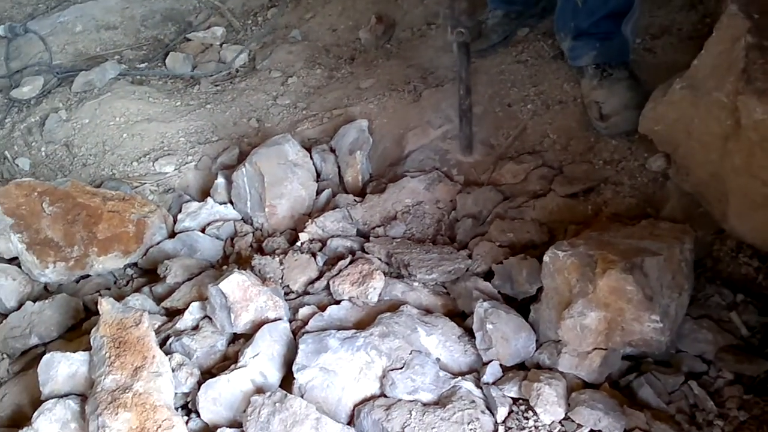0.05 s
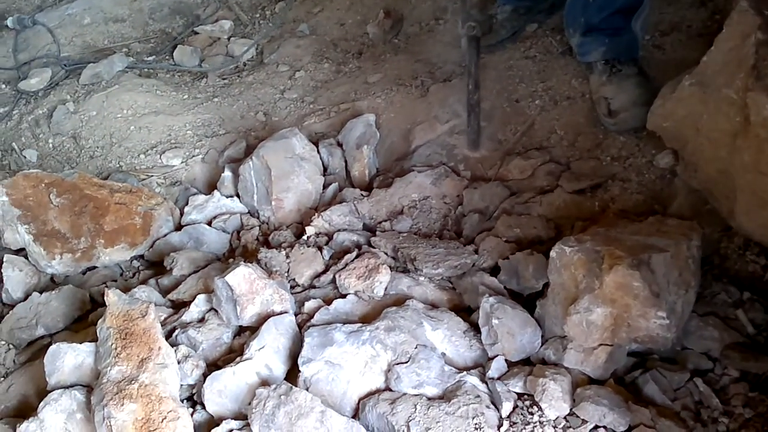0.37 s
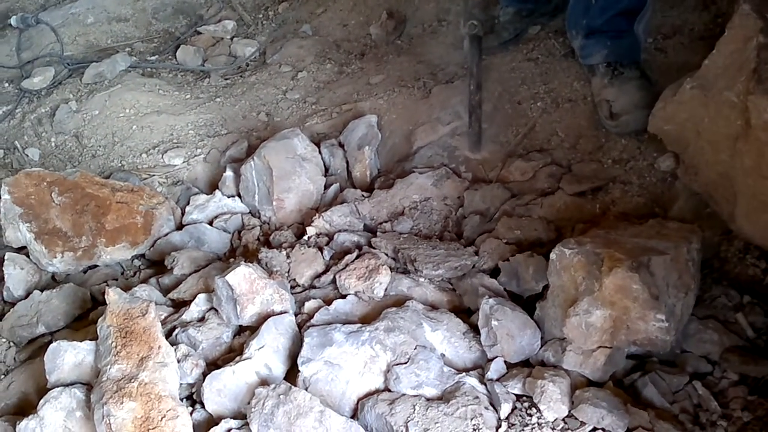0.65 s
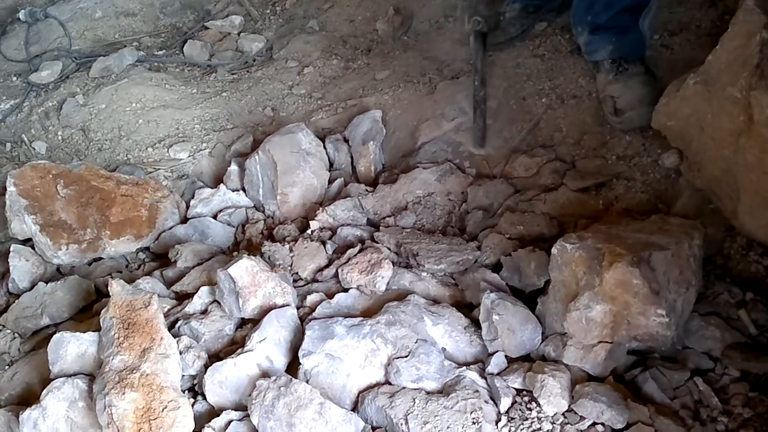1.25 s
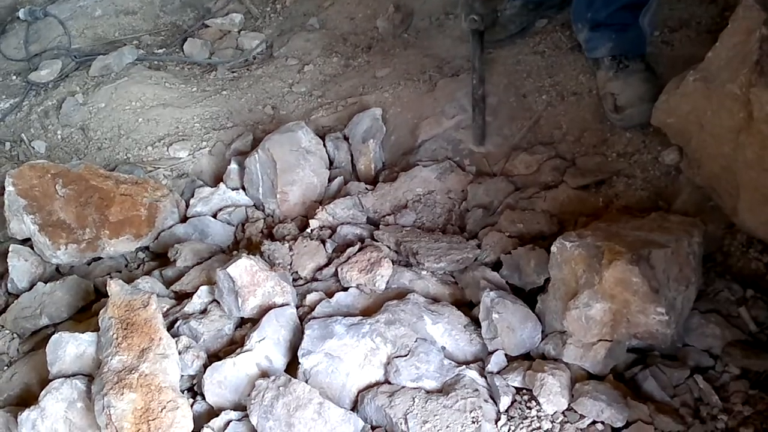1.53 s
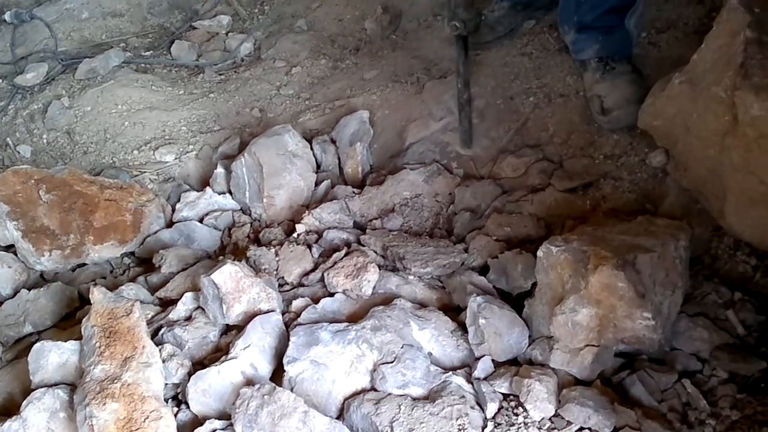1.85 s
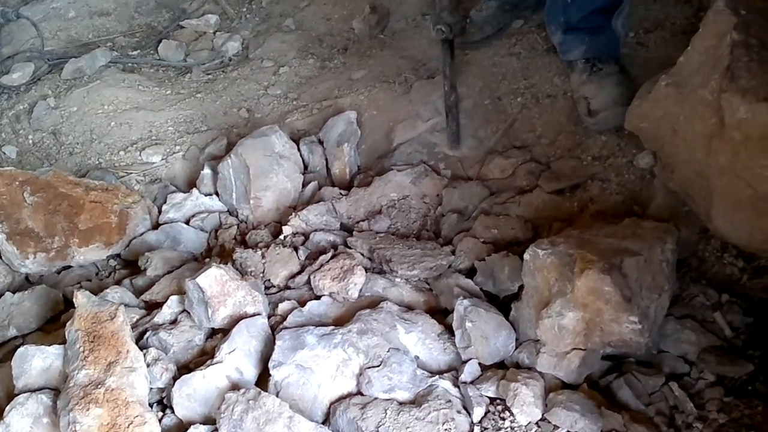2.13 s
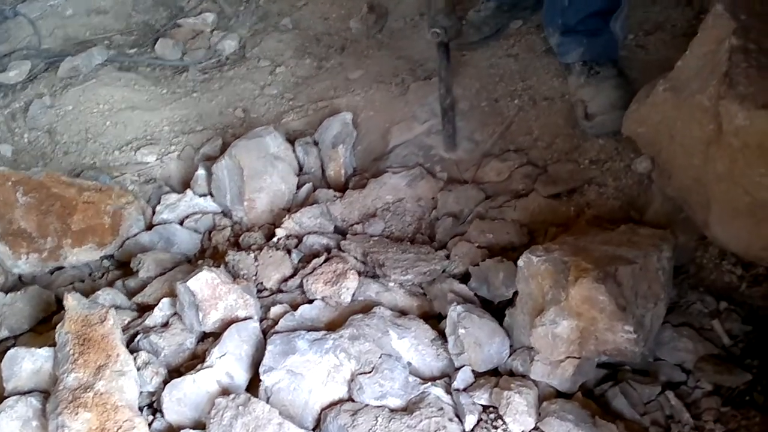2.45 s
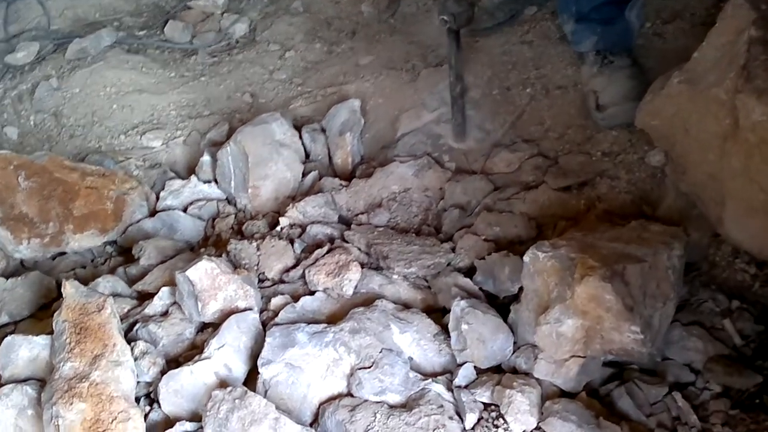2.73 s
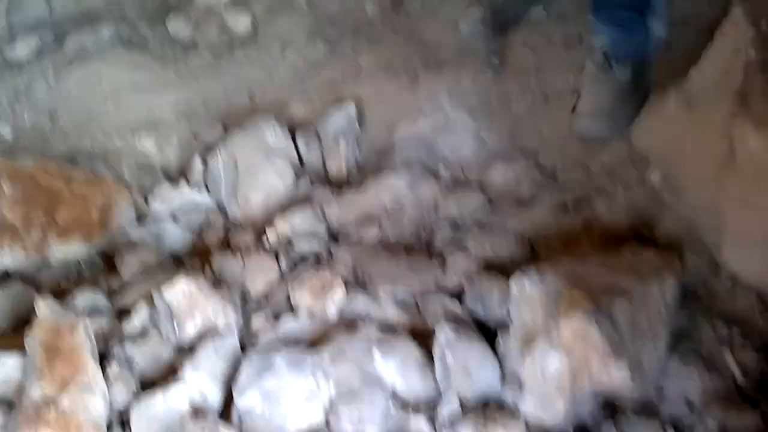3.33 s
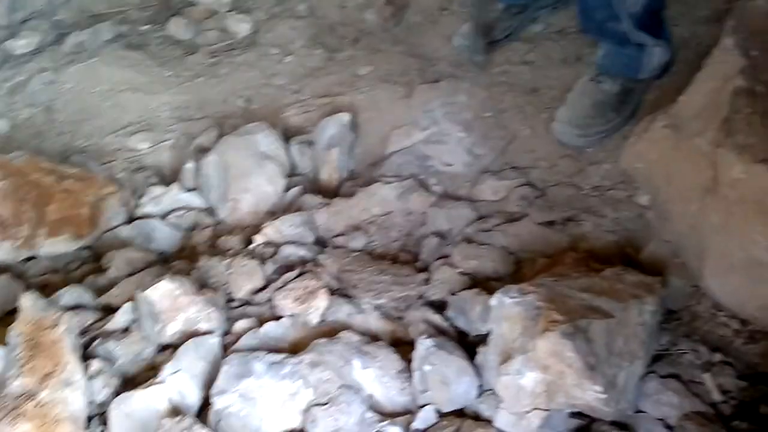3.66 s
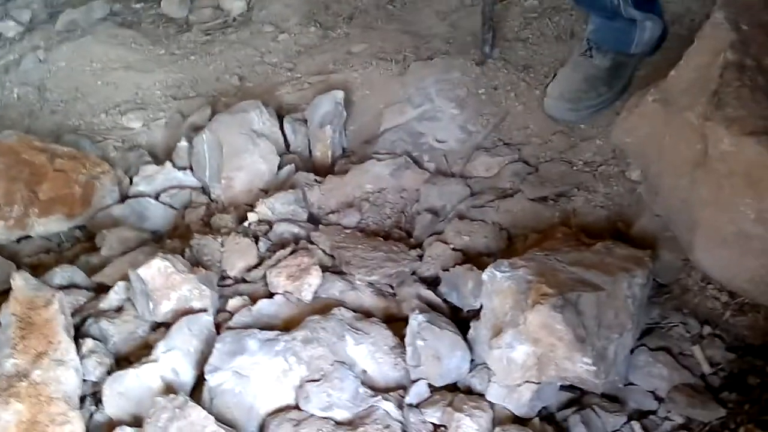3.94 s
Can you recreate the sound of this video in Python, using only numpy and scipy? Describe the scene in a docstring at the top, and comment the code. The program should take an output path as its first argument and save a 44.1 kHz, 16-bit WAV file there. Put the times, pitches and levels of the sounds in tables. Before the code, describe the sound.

A pneumatic breaker hammers rapidly on rock, then stops with a rattle and a knock.

```python
"""Pneumatic breaker on stony ground

A piston strikes about 19 times a second, then slows and stops. Each impact cracks the rock, excites
the modes of the steel chisel and vents a low puff of air that a wall reflects. The loose chisel rattles
as it is lifted and is set down with a knock in sliding rubble. The loudest rings overload the microphone.
"""
import sys
import numpy as np
from scipy import signal
from scipy.fft import rfft, irfft, next_fast_len
from scipy.io import wavfile
from scipy.ndimage import map_coordinates

SR = 44100
rng = np.random.default_rng(int(sys.argv[2]) if len(sys.argv) > 2 else 0)


def wrap_up_sound(samples):
    """Save the sound to the file named by the first command line argument, as 16-bit audio."""
    columns = np.atleast_2d(samples).T
    # keep every value between -1 and 1, then stretch to whole-number steps
    tamed = np.clip(columns, -1, 1)
    steps = np.round(tamed * 32767).astype(np.int16)
    wavfile.write(sys.argv[1], SR, steps)


N = 176400
HIT_N = 13230  # samples in one impact
HIT_T = np.arange(HIT_N) / SR

# piston blows: t/s, crack level/dB, ring level/dB
PISTON_BLOWS = [(-0.024, -11.5, -18.5), (0.028, -22, -16), (0.079, -23.0, -20.5), (0.13, -20.5, -18.5),
                (0.183, -20.5, -14.5), (0.234, -22.5, -22.5), (0.285, -21, -18), (0.335, -20.5, -21),
                (0.388, -21, -11), (0.439, -21.5, -30), (0.492, -21.5, -19.5), (0.542, -24.5, -16.0),
                (0.596, -22, -13.5), (0.647, -21.5, -18.5), (0.7, -18, -26), (0.751, -23, -25),
                (0.803, -20.5, -19.5), (0.857, -21.5, -22), (0.91, -21.5, -16), (0.96, -19, -20.5),
                (1.014, -22, -20.5), (1.065, -19.5, -26.5), (1.12, -19, -22), (1.172, -17, -17.5),
                (1.226, -20, -16.5), (1.277, -20.5, -22.5), (1.33, -20, -21), (1.384, -21.5, -20.5),
                (1.436, -21, -22.5), (1.488, -23.5, -32), (1.54, -18, -13), (1.593, -24, -21.5),
                (1.643, -21, -21.5), (1.698, -19.5, -15.5), (1.75, -21, -14.0), (1.803, -19.5, -20.5),
                (1.856, -22.5, -20), (1.906, -20.0, -23), (1.961, -23, -17.5), (2.011, -18, -9),
                (2.064, -28, -16), (2.115, -17, -17), (2.168, -20.5, -15), (2.219, -16.5, -13),
                (2.273, -20, -12), (2.324, -19, -17.5), (2.378, -18.5, -9), (2.43, -18.5, -13.5),
                (2.482, -21.5, -7), (2.536, -23, -9), (2.588, -20.5, -10), (2.641, -21, -13),
                (2.694, -23, -17), (2.75, -24, -26.5), (2.812, -22.5, -17), (2.882, -22, -15),
                (2.96, -23.5, -29), (3.054, -25, -20)]
# bite of the tip, hardest on solid rock: t/s, level/dB
TIP_BITE = [(0.2, -35.5), (0.7, -26.5), (1.5, -31.5), (2.4, -31), (2.87, -20.5), (3.05, -35)]
# exhaust strength, falling as the trigger is let go: t/s, level/dB
EXHAUST_LEVEL = [(0, -27.5), (2.7, -30), (3.05, -32.5)]
# knocks of the loose chisel in its holder: t/s, clank level/dB, ring level/dB
CHISEL_KNOCKS = [(3.154, -30, -42), (3.205, -28.5, -44), (3.242, -30.5, -36), (3.272, -32, -55),
                 (3.302, -31.5, -53), (3.506, -24.5, -31), (3.540, -29.5, -45), (3.802, -29.5, -41),
                 (3.83, -18.5, -13.5), (3.846, -22.5, -28)]
# thuds of the casing as it is set down: t/s, level/dB
CASING_THUDS = [(3.801, -36.5), (3.838, -33.5)]
# envelope of the sliding rubble: t/s, level/dB
RUBBLE_LEVEL = [(3.826, -41), (3.844, -14), (3.89, -22), (3.926, -22), (3.965, -38), (4.0, -34)]
# clicks of single stones: t/s, level/dB
PEBBLE_CLICKS = [(3.470, -29), (3.653, -43), (3.861, -15), (3.92, -14)]

# normal modes: f/Hz, level/dB, T60/s
CHISEL_MODES = [(4687, -2, .14), (4860, -1, .11), (10336, -1, .1), (7190, 0, .15), (7300, -2, .14),
                (7390, -12, .1), (13675, 0, .08), (13970, -4, .08), (14950, -5, .14)]
HOLDER_MODES = [(1023, -5.5, 0.018), (1463, -7, 0.025), (1740, -2, 0.024), (2356, -2.5, 0.028),
                (10423, 1, 0.17), (12320, -0.5, 0.06), (13500, 2, 0.015)]  # holder and shank
CASING_MODES = [(88, -15.5, 0.046), (136.6, 5.5, 0.07), (182.7, -8, 0.2), (250.4, -6.5, 0.29),
                (355.5, 4, 0.076), (522.6, 8.5, 0.027)]  # casing and exhaust port

# spectral densities: f/Hz, relative level/dB
CRACK_SPECTRUM = [(100, -17.5), (300, -7), (700, -5), (1500, -6), (3000, -5.5), (4400, -6), (5000, -0.5),
                  (6600, 0.5), (7600, 5.5), (11500, 0), (14000, 5), (15500, -6)]
CLANK_SPECTRUM = [(200, -14.5), (1700, 0.5), (2800, -3), (6600, 2), (7800, 5), (10600, 6), (15500, -25)]
STONE_SPECTRUM = [(60, -3.5), (200, 11.5), (500, -4.5), (1700, 9.5), (2700, -4), (3500, 3.5), (8000, 5.5),
                  (15000, -4)]
AIR_SPECTRUM = [(25, -15), (75, -9.5), (150, -19), (1600, -29.5), (15000, -37)]
THUD_SPECTRUM = [(80, -26), (230, -3), (380, -23), (1500, -41)]
CLICK_SPECTRUM = [(150, -8), (800, -1), (1600, -5), (3800, -9.5), (14000, -18)]

# reverberation time of the site: f/Hz, T60/s
REVERB_T60 = [(150, 0.75), (3000, 0.44), (14000, 0.25)]

MAIN_MODES = [mode for mode in CHISEL_MODES if 7000 < mode[0] < 7600]
UPPER_MODES = [mode for mode in CHISEL_MODES if mode[0] > 13000]
MINOR_MODES = [mode for mode in CHISEL_MODES if mode not in MAIN_MODES + UPPER_MODES]
RETURN_DELAY_S, TRIGGER_RELEASE_S = 0.043, 2.72
DETUNE_HZ, TOP_HZ = 12.2, 15750


def hammering():
    """Impact excitation: each blow crushes rock and sets the holder and the chisel vibrating."""
    out, bank = np.zeros(N), partials(CRACK_SPECTRUM)
    times, _, ring_levels = np.transpose(PISTON_BLOWS)
    for (s, crack_db, ring_db), cycle_s in zip(PISTON_BLOWS, np.gradient(times)):
        clank = amp(-5.5) * holder_clank()
        add(out, s, gain_at(TIP_BITE, s) * crush(STONE_SPECTRUM, length_s=0.0045))
        crack = amp(0.5) * crush(CRACK_SPECTRUM) + amp(-6) * jangle(bank)
        add(out, s, amp(crack_db) * (crack + clank))
        main = seated(steel(MAIN_MODES, DETUNE_HZ, vary_db=11), cycle_s)
        upper_db = -23.5 + 3 * rng.normal()
        upper = seated(steel(UPPER_MODES, detune_hz=59, vary_db=4), cycle_s)
        minor_db = -28.5 + 0.39 * (ring_db - ring_levels.mean())  # partly follows the main ring
        minor = seated(steel(MINOR_MODES, detune_hz=26.7, vary_db=2), cycle_s)
        add(out, s, amp(ring_db + 0.5) * main + amp(upper_db) * upper + amp(minor_db) * minor)
        if s < TRIGGER_RELEASE_S:  # the return stroke rattles the holder again
            add(out, s + RETURN_DELAY_S, amp(-35) * (crush(CRACK_SPECTRUM) + holder_clank()))
    return out


def steel(modes, detune_hz, vary_db):
    """Forced vibration: a burst of uneven chatter is convolved with the modal impulse response."""
    jolts_db = 7 * np.repeat(rng.standard_normal(HIT_N // 90), 90)
    chatter = rng.standard_normal(HIT_N) * decay(t60=0.063) * amp(jolts_db)
    return unit_hit(signal.fftconvolve(chatter, ringing(modes, detune_hz, vary_db))[:HIT_N])


def ringing(modes, detune_hz, vary_db):
    """Modal superposition: damped sinusoids, varying in level and frequency from blow to blow."""
    out = np.zeros(HIT_N)
    for hz, db, t60 in modes:
        envelope = amp(db + vary_db * rng.normal()) * decay(t60)
        out += envelope * np.cos(2 * np.pi * (hz + detune_hz * rng.normal()) * HIT_T)
    return out


def seated(ring, cycle_s, rise_s=0.0014, flutter_s=0.003, seat_s=0.015):
    """Contact damping: the chisel springs free, grazes the hole, then is muted as it lands on rock."""
    free_s = 0.58 * cycle_s * np.exp(0.1 * rng.normal())
    rise = 1 - np.exp(-HIT_T / rise_s)
    flutter_db = 3.5 * map_coordinates(rng.standard_normal(HIT_N), [HIT_T / flutter_s])
    damping_db = -15.5 * np.clip((HIT_T - free_s) / seat_s, 0, 1)
    return unit_hit(ring * rise * amp(flutter_db + damping_db))


def crush(spectrum, length_s=0.015):
    """Contact noise: grit holds briefly, then collapses, with a new duration and colour each time."""
    hold_s = length_s * np.exp(0.35 * rng.normal())
    noise = grit(spectrum, HIT_N, spiky_db=3)
    colour = np.c_[np.geomspace(300, TOP_HZ, 14), 2.5 * rng.standard_normal(14)]
    return unit_hit(shaped(noise, colour) / (1 + (HIT_T / hold_s) ** 3))


def holder_clank():
    """Damped resonance: chatter drives the short-lived modes of the holder and shank."""
    return steel(HOLDER_MODES, detune_hz=65.7, vary_db=3)


def partials(spectrum, count=110):
    """Free vibration: the many weak, inharmonic partials of the steel tool, one per row."""
    hz = rng.uniform(2900, TOP_HZ, (count, 1))
    return amp(along(spectrum, hz)) * np.sin(2 * np.pi * hz * HIT_T) * decay(t60=0.23)


def jangle(bank, vary_db=5.5):
    """Selective excitation: each contact favours a different handful of partials."""
    coupling, strength = rng.standard_normal((2, len(bank)))
    return unit_hit((coupling * amp(vary_db * strength)) @ bank)


def exhaust(port_delay_s=0.00409):
    """Low resonances: the piston kicks the casing, then the port puffs; a wall returns the bass."""
    out = np.zeros(N)
    for s, *_ in PISTON_BLOWS:
        gain = gain_at(EXHAUST_LEVEL, s)
        kick = amp(-7) * unit_hit(ringing(CASING_MODES, detune_hz=14, vary_db=1))
        puff = amp(rng.normal()) * unit_hit(ringing(CASING_MODES, detune_hz=5.8, vary_db=0.5))
        add(out, s, gain * kick)
        add(out, s + port_delay_s, gain * puff)
    return filtered(out, lambda hz: (1 + wall_reflection(hz)) * lowpass(hz, 700))


def wall_reflection(hz, delay_s=0.00988):
    """Reflection: the response of a delayed bass echo, which interferes with the direct sound."""
    return amp(1.5) * np.exp(-2j * np.pi * hz * delay_s) * lowpass(hz, 241)


def loose_chisel():
    """Rattle in a clearance: the chisel knocks in its holder; the casing thuds as it is set down."""
    out, bank = np.zeros(N), partials(CLANK_SPECTRUM)
    for s, clank_db, ring_db in CHISEL_KNOCKS:
        clank = amp(-3.5) * crush(CLANK_SPECTRUM, length_s=0.022) + amp(-14.5) * jangle(bank)
        ring = steel(UPPER_MODES, detune_hz=60, vary_db=11)
        ring += amp(-0.5) * steel(CHISEL_MODES, DETUNE_HZ, vary_db=3)
        add(out, s, amp(clank_db) * clank + amp(ring_db) * seated(ring, cycle_s=0.051))
    for s, db in CASING_THUDS:
        thud = grit(THUD_SPECTRUM, HIT_N, spiky_db=10) * decay(t60=0.29)
        add(out, s, amp(db) * unit_hit(thud))
    return out


def rubble():
    """Friction and collision: stones slide under the tool, and single ones click."""
    out = gain_at(RUBBLE_LEVEL, np.arange(N) / SR, before_db=-120) * grit(STONE_SPECTRUM, N, spiky_db=2)
    for s, db in PEBBLE_CLICKS:
        add(out, s, amp(db) * grit(CLICK_SPECTRUM, HIT_N, spiky_db=3) * decay(t60=0.018))
    return out


def reverberation(direct, scatter_hz=255):
    """Scattering: nearby rocks return little bass, and the treble of the diffuse tail dies first."""
    hz, t, bands = signal.stft(rng.standard_normal(HIT_N), SR, nperseg=128)
    bands *= amp(-60 * t / along(REVERB_T60, hz)[:, None])
    tail = signal.istft(bands, SR, nperseg=128)[1][:HIT_N]
    scattered = filtered(direct, lambda hz: hz ** 2 / (hz ** 2 + scatter_hz ** 2))
    return signal.fftconvolve(scattered, tail / np.linalg.norm(tail))[:N]


def background():
    """Ambient noise: a faint rumble, strongest in the bass."""
    return amp(-52) * grit(AIR_SPECTRUM, N, spiky_db=4.5)


def grit(spectrum, size, spiky_db):
    """Random modulation: coloured noise of unit rms whose level jumps from grain to grain."""
    grains = np.repeat(rng.standard_normal(size // 30 + 1), 30)[:size]
    noise = shaped(rng.standard_normal(size) * amp(spiky_db * grains), spectrum)
    return noise / rms(noise)


def amp(db):
    return 10 ** (np.asarray(db) / 20)


def gain_at(levels, s, before_db=None):
    """Amplitude at time s on a level curve."""
    return amp(np.interp(s, *np.transpose(levels), left=before_db))


def along(points, hz):
    """Interpolation on a logarithmic frequency axis."""
    f, values = np.transpose(points)
    return np.interp(np.log(hz + 1), np.log(f + 1), values)


def rms(x):
    return np.sqrt(np.mean(x ** 2) + 1e-20)


def unit_hit(x):
    """Normalisation to unit rms over the first 40 ms."""
    return x / rms(x[:1764])


def decay(t60):
    """Exponential decay by 60 dB in t60 seconds."""
    return amp(-60 * HIT_T / t60)


def add(track, s, x):
    """Superposition of x on the track at time s."""
    start = round(s * SR)
    x = x[max(-start, 0):N - start]
    track[max(start, 0):][:len(x)] += x


def lowpass(hz, cutoff_hz, order=4):
    return 1 / (1 + (hz / cutoff_hz) ** order)


def filtered(x, response):
    """Linear filtering: the spectrum of x times a frequency response."""
    size = next_fast_len(len(x) + 4096)
    return irfft(rfft(x, size) * response(np.fft.rfftfreq(size, 1 / SR)), size)[:len(x)]


def shaped(x, spectrum):
    """Filtering by a tabulated spectrum."""
    return filtered(x, lambda hz: amp(along(spectrum, hz)))


def scene():
    """Superposition of direct sound, reverberation and ambient noise."""
    direct = hammering() + exhaust() + loose_chisel() + rubble()
    return (direct + amp(-8.5) * reverberation(direct) + background())[None]


def record(dry, ceiling=0.74, hardness=10):
    """Saturation and band limiting: the microphone rounds off peaks and cuts the highest treble."""
    rounded = dry[0] / (1 + np.abs(dry[0] / ceiling) ** hardness) ** (1 / hardness)
    return filtered(rounded, lambda hz: lowpass(hz, TOP_HZ, order=150))[None]


dry = scene()
out = record(dry)
wrap_up_sound(out)
```